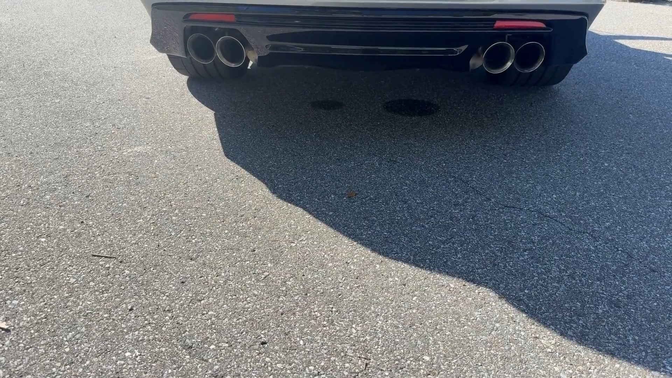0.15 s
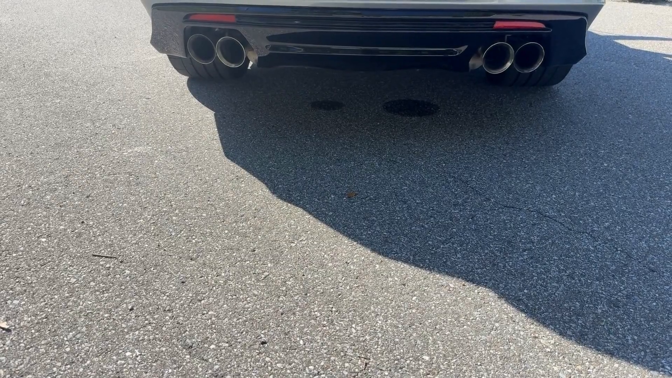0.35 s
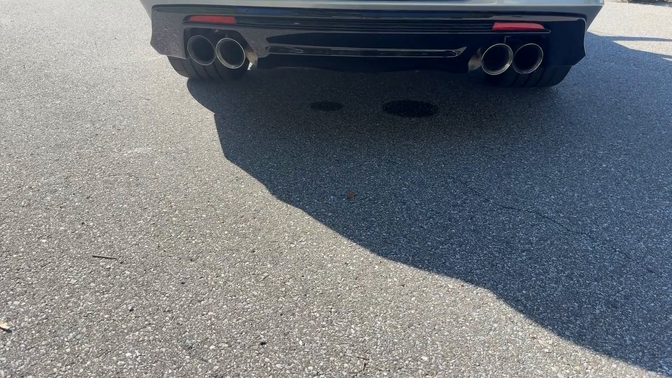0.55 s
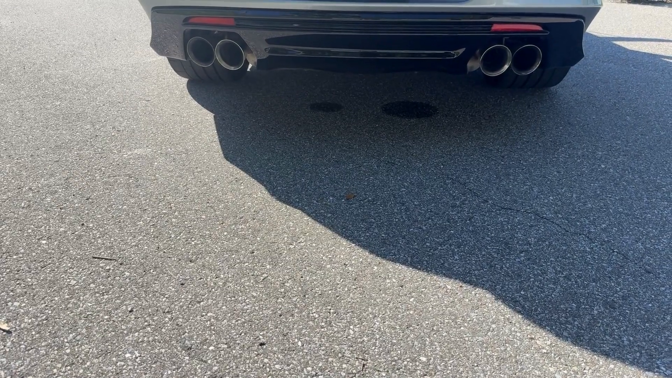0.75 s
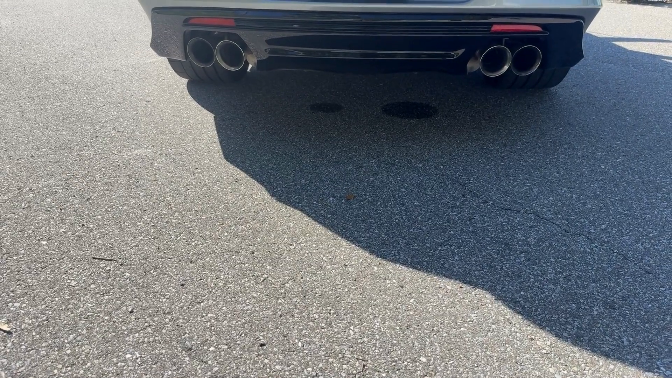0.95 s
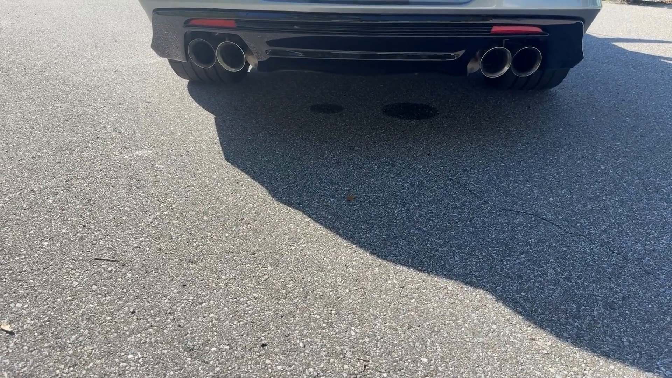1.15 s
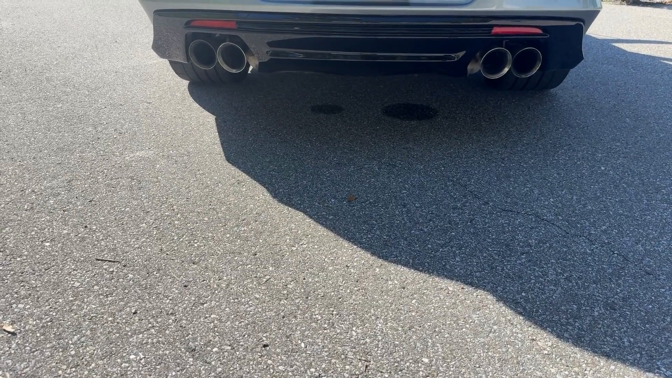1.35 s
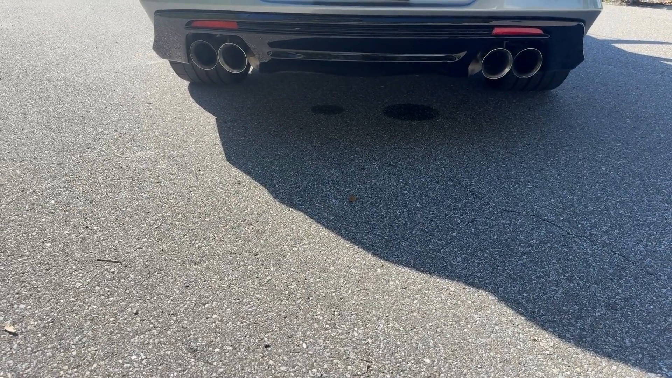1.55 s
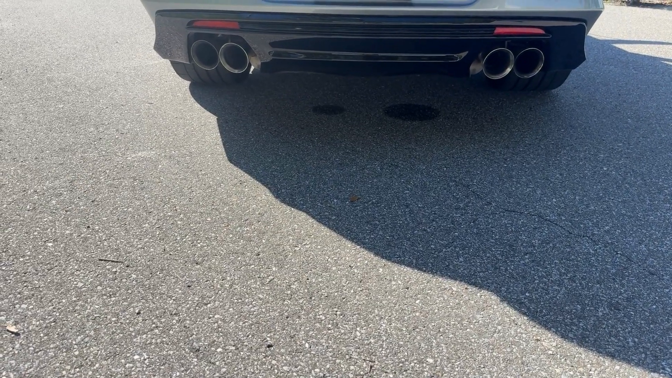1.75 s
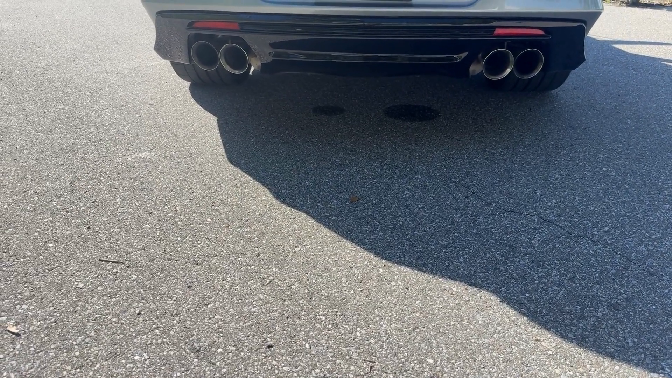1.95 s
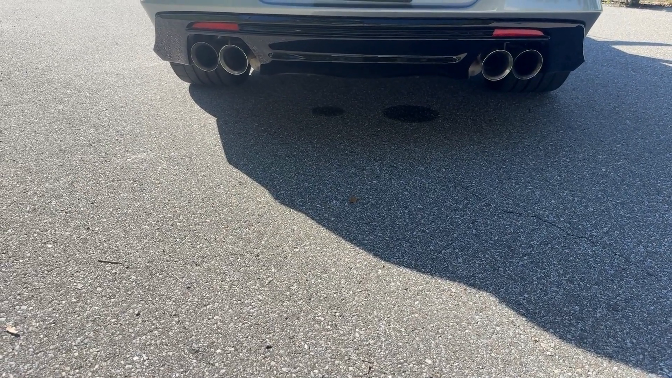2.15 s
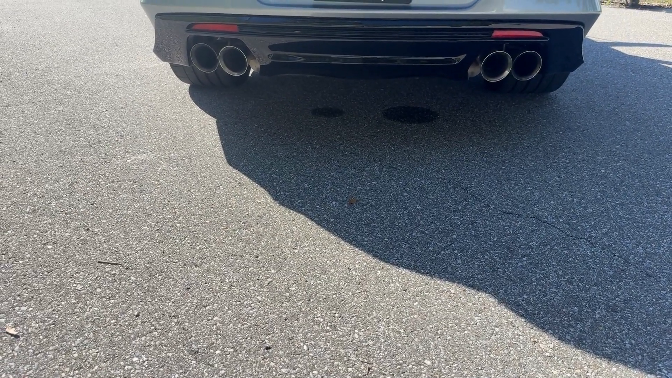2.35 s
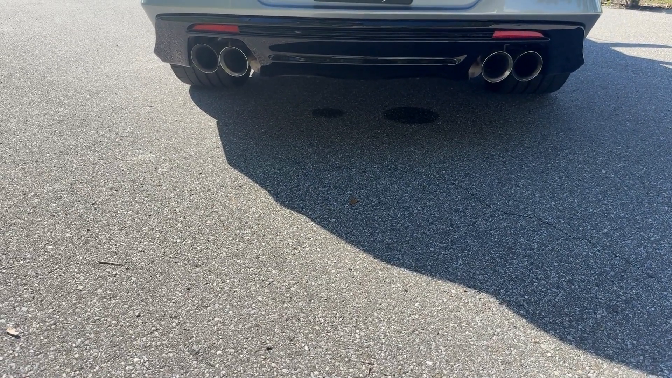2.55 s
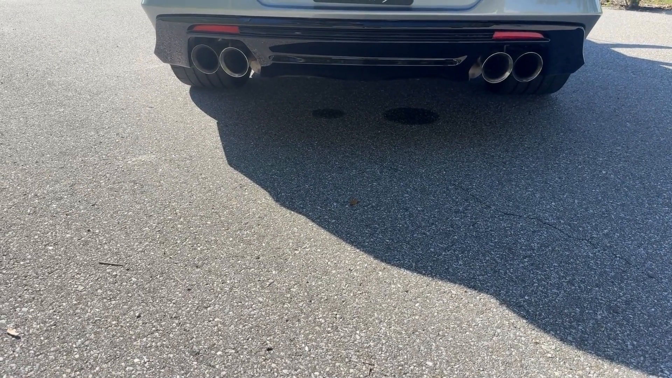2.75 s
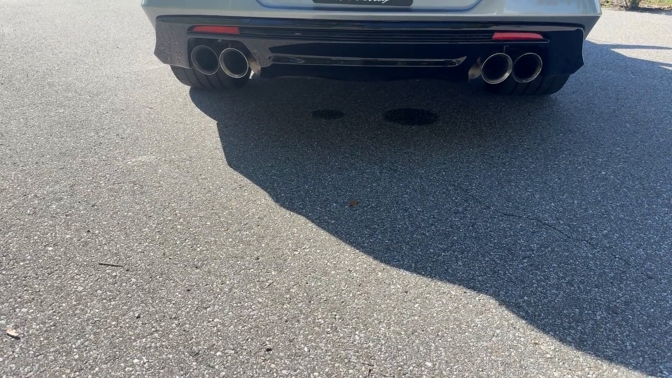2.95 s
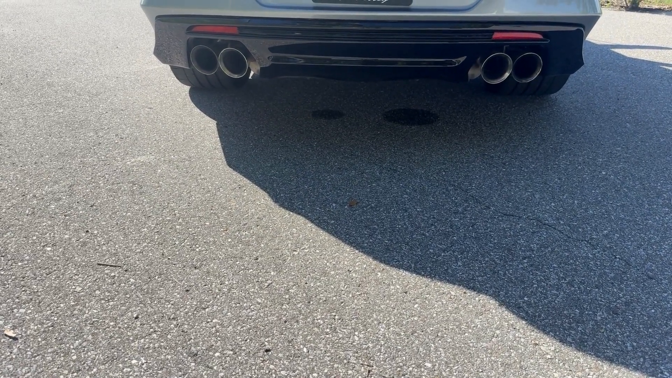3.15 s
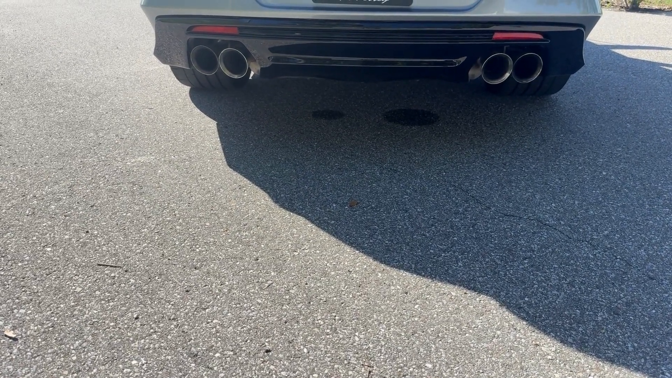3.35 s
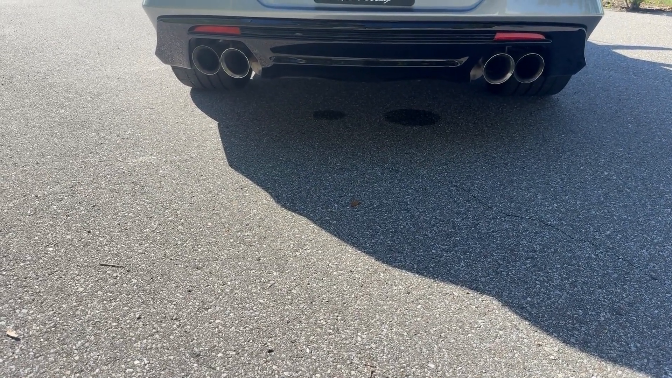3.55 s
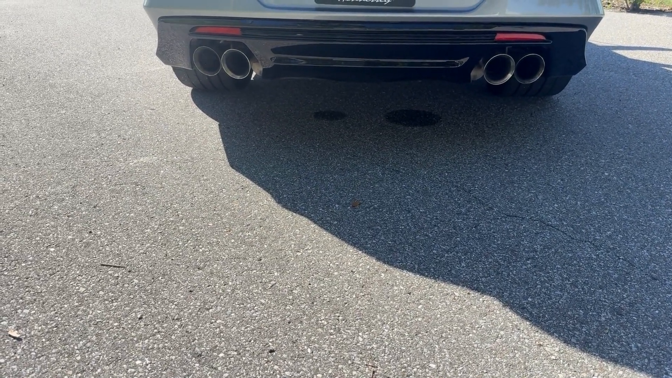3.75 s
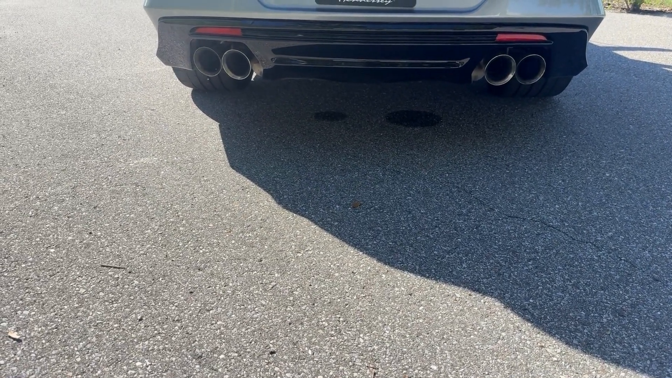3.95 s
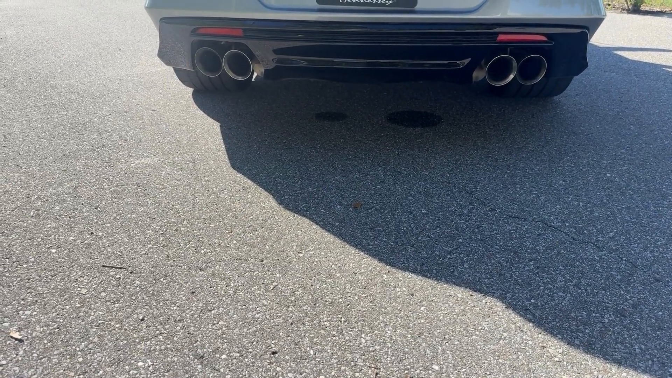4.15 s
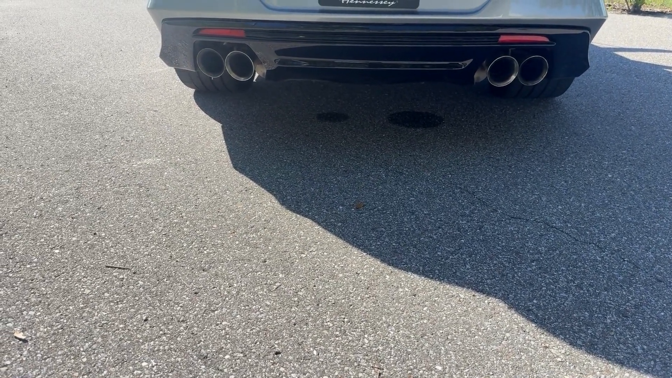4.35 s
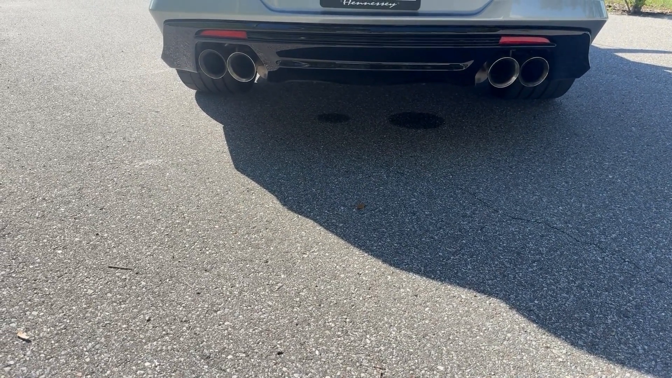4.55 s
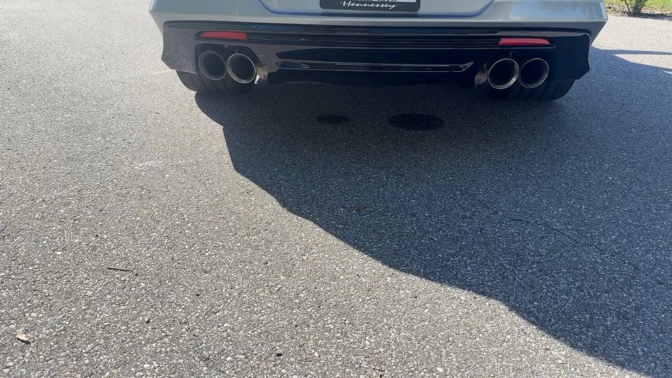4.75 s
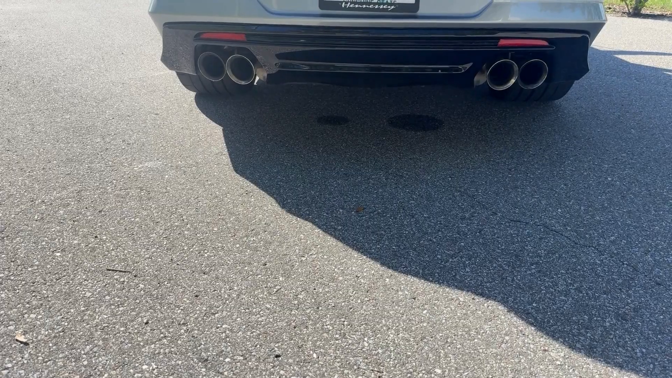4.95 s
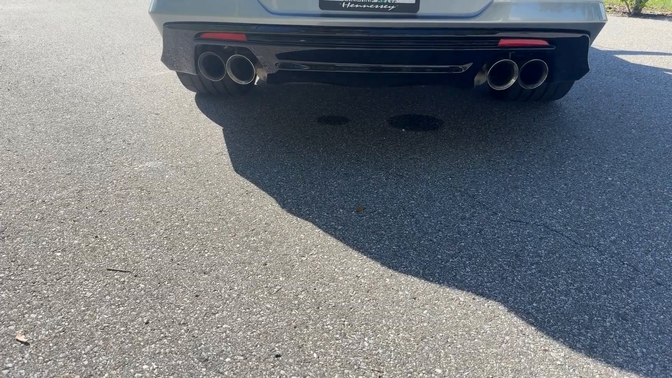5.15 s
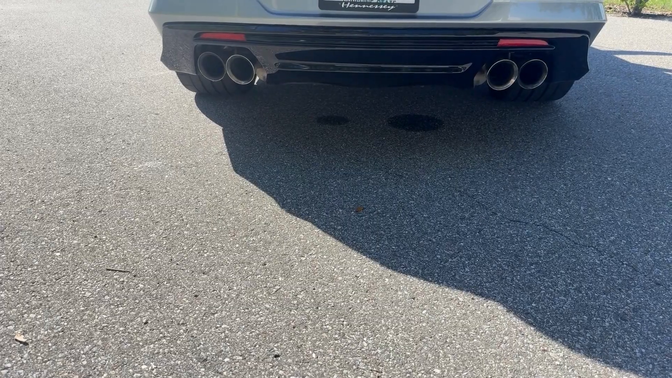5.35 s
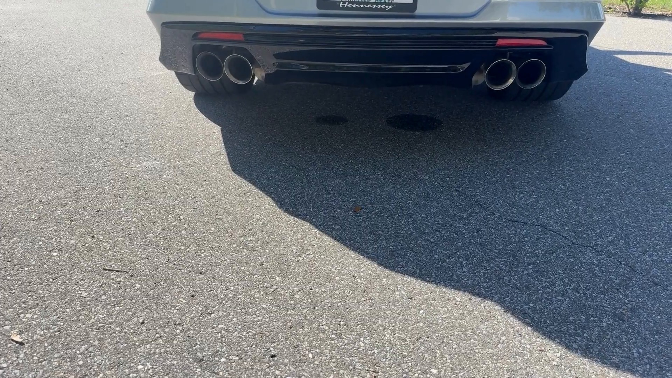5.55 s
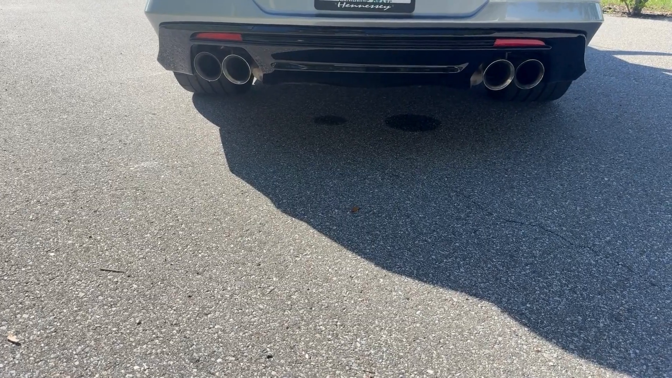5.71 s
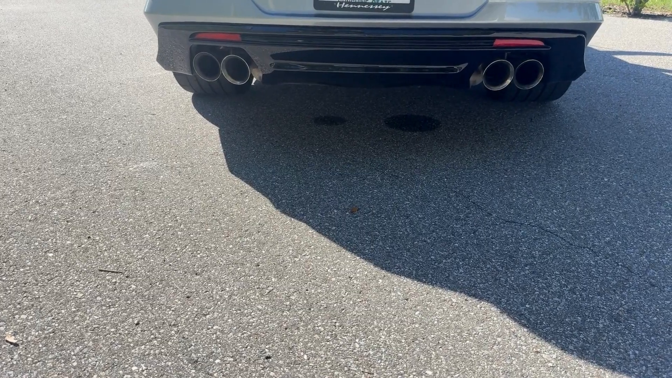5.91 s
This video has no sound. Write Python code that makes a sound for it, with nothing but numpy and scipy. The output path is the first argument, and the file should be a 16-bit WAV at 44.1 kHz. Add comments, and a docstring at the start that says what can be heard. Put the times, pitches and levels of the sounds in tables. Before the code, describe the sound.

Low traffic rumbles in an open lot. A few metres behind a car's tailpipes, the starter clunks in and cranks with a rising and sagging gear whine. The supercharged V8 catches with a loud flare and a rapid burst of exhaust bangs, then sinks to a deep, loping fast idle with scattered pops.

```python
"""A supercharged V8 starts in an open lot, heard a few metres behind its tailpipes.
Traffic rumbles throughout. At 2.3 s the solenoid ticks and the starter pinion clunks in; its gear whine
rises and sags with every compression. At 3.4 s the engine catches and flares, unburnt fuel banging in
the pipes. From 4 s it sinks to a deep, loping fast idle: gas slugs boom, growl, rasp and hiss through
the exhaust, with scattered misfires and pops."""
import sys
import numpy as np
from scipy import signal
from scipy.fft import rfft, irfft
from scipy.io import wavfile
from scipy.ndimage import uniform_filter1d, map_coordinates

SR = 44100
rng = np.random.default_rng(int(sys.argv[2]) if len(sys.argv) > 2 else 0)


def digitize_waveform(pressure):
    """Quantize a signal to 16-bit integers and store it at the path in sys.argv[1].

    Rows of a 2-D input are taken as channels; values are limited to [-1, 1].
    """
    field = np.atleast_2d(pressure).T
    bounded = np.clip(field, -1, 1)
    quanta = np.round(bounded * 32767).astype(np.int16)
    wavfile.write(sys.argv[1], SR, quanta)


N = 268128
TIME = np.arange(N) / SR
CATCH_S, BURST_ATTACK_S, BURST_HOLD_S = 3.385, 0.0085, 0.31

# exhaust pipe response: f/Hz, level/dB
PIPE_SPECTRUM = [(22, -35), (38, -4), (55, -6), (130, 6), (210, 1.5), (270, -10.5), (340, -11),
                 (460, -10.5), (600, -14), (800, -25), (1100, -27.5), (2500, -68.5)]
# tailpipe rasp: f/Hz, level/dB
RASP_SPECTRUM = [(250, -15), (500, 9.5), (850, -2.5), (1000, 0.5), (1120, 11.5), (1280, 5.5), (1450, 8),
                 (1680, -2), (1900, 3.5), (2120, 4), (2300, -39), (2850, -22), (3600, -23), (7000, -20)]
# stereo width of gear noise: f/Hz, side over mid/dB
GEAR_SPREAD = [(2000, -30), (4000, -19), (6500, -14), (9500, -9), (13000, -8)]
# overfull firings: t/s, level/dB
POP_EVENTS = [(3.7373, -26), (3.8128, -22), (3.851, -9.5), (3.8793, -12), (3.9374, -14.5), (4.0023, -6.5),
              (4.079, -16), (4.1566, -14.5), (4.1967, -19), (4.5685, -16), (4.6747, -19.5), (4.7218, -24.5),
              (4.771, -17), (4.8065, -25), (4.974, -19), (5.0778, -27), (5.1958, -21.5), (5.329, -17.5),
              (5.826, -23.5), (6.04, -24)]


def from_db(db):
    return 10 ** (np.asarray(db) / 20)


def unit_rms(x):
    return x / np.sqrt(np.mean(x ** 2) + 1e-20)


def levelled(x, window=4500):
    """Slow RMS held at 1; single beats remain."""
    return x / np.sqrt(np.abs(uniform_filter1d(x ** 2, window)) + 1e-12)


def curve(rows):
    return np.interp(TIME, *np.transpose(rows))


def ramp(start_s, length_s):
    return np.clip((TIME - start_s) / length_s, 0, 1)


def ease_out(start_s, length_s):
    return np.exp(-(np.maximum(TIME - start_s, 0) / length_s) ** 2)


def bump(centre_s, sigma_s):
    return np.exp(-.5 * ((TIME - centre_s) / sigma_s) ** 2)


def noise():
    return rng.standard_normal(N)


def drift(rate_hz):
    """Smooth random curve, spread about 1."""
    knots = rng.standard_normal(4096)
    return map_coordinates(knots, [TIME * rate_hz], order=2, mode="wrap")


def coloured(x, spectrum, size=8192):
    """Minimum-phase filter from rows of f/Hz, level/dB."""
    hz, db = np.transpose(spectrum)
    grid_hz = np.maximum(np.arange(size // 2 + 1) * SR / size, 1)
    gain = from_db(np.interp(np.log(grid_hz), np.log(hz), db))
    cepstrum = irfft(np.log(gain))
    cepstrum[1:size // 2] *= 2
    cepstrum[size // 2 + 1:] = 0
    return signal.oaconvolve(x, irfft(np.exp(rfft(cepstrum))))[:N]


def stereo_noise(envelope, spectrum, spread, width=1):
    mid = coloured(noise() * envelope, spectrum)
    side = width * coloured(coloured(noise() * envelope, spectrum), spread)
    return np.array([mid + side, mid - side])


def delayed(x, lag_s):
    return np.interp(TIME - lag_s, TIME, x, left=0)


def kicks_at(events):
    """One impulse per row of t/s, level/dB."""
    kicks = np.zeros(N)
    for s, db in events:
        kicks[int(s * SR)] += from_db(db)
    return kicks


def decay(kicks, decay_s):
    return signal.lfilter([1], [1, -np.exp(-1 / (decay_s * SR))], kicks + 1e-18)


def rise_decay(kicks, rise_s, decay_s):
    return decay(decay(kicks, rise_s) / (rise_s * SR), decay_s)


def ring(x, hz, t60_s):
    """Damped mode; a unit impulse rings at height 1."""
    r, w = from_db(-60 / (t60_s * SR)), 2 * np.pi * hz / SR
    return signal.lfilter([0, np.sin(w)], [1, -2 * r * np.cos(w), r * r], x + 1e-18)


def low_cut(x, hz):
    return signal.sosfilt(signal.butter(3, hz, "high", fs=SR, output="sos"), x)


def traffic(level_db=-36.5, drone_hz=66, drone_db=-8, waver=0.0786, throb_db=4):
    """Wide rumble from all around, with a wavering drone."""
    # rumble: f/Hz, level/dB
    spectrum = [(20, -46), (32, -31), (48, -5), (69, -2.5), (95, -8), (189, -16), (337, -30), (809, -28),
                (1440, -36.5), (2700, -45.5), (3970, -57), (6320, -57.5), (14000, -73)]
    # width: f/Hz, side over mid/dB
    spread = [(50, -25), (130, -16), (250, -10), (500, -5), (1000, -3), (2000, -7), (4000, -14)]
    cycles = np.cumsum(drone_hz * (1 + waver * drift(7.2))) / SR
    drone = np.sin(2 * np.pi * cycles) * from_db(throb_db * drift(12))
    rumble = unit_rms(stereo_noise(1, spectrum, spread))
    return from_db(level_db) * (rumble + from_db(drone_db) * unit_rms(drone))


def outdoors(direct, scatter_db, onset_s=.003, decay_s=.025, size=8192):
    """Adds echoes, and scatter from the sides that widens the sound."""
    # echoes off ground, car and far walls: delay/s, level/dB
    reflections = [(.0047, -22), (0.0138, -26.5), (0.028, -17.5), (.047, -16), (0.082, -20.5)]
    # scatter width: f/Hz, side over mid/dB
    spread = [(40, -31), (125, -12), (250, -14.5), (500, -11), (1500, -11), (4000, -18), (13000, -56)]
    mid = direct.mean(axis=0)
    bright = mid - coloured(mid, [(150, 0), (500, -20), (2000, -40)])
    echoes = sum(from_db(db) * delayed(bright, s) for s, db in reflections)
    tail = rng.standard_normal(size) * np.exp(-TIME[:size] / decay_s) * (TIME[:size] > onset_s)
    scatter = signal.oaconvolve(mid, tail / np.linalg.norm(tail))[:N]
    side = from_db(scatter_db) * coloured(scatter, spread)
    return direct + echoes + np.array([side, -side])


def pinion(ring_db=-9, clash_db=-5, thud_db=-4, bounce_s=.0066, bounce_loss_db=6):
    """The pinion bounces into mesh and rings the housing; seating, it thuds down the pipes."""
    # solenoid tick: t/s, level/dB
    tick = [(2.332, -53)]
    # pinion hits the ring gear, then seats: t/s, level/dB
    clunks = [(2.3838, -25), (2.405, -27.5)]
    # starter housing modes, and a low thud of the car's body: f/Hz, level/dB, t60/s
    housing = [(81.5, 2, 0.18), (370, 0.5, 0.42), (447, 1, 0.098), (806, -1, 0.052), (1280, 3, .04)]
    # steel teeth clashing: f/Hz, level/dB
    clash_spectrum = [(200, -20), (400, 6), (1500, -2), (2800, 5), (4300, -9), (8000, -12.5), (16000, -17)]
    kicks = kicks_at([(s + bounce_s * k * rng.uniform(1.0, 1.15), db - bounce_loss_db * k)
                      for s, db in clunks for k in range(3)])
    rings = sum(from_db(db) * ring(kicks * rng.choice([-1, 1], N), hz, t60) for hz, db, t60 in housing)
    clash = unit_rms(stereo_noise(1, clash_spectrum, GEAR_SPREAD))
    clash *= rise_decay(kicks + kicks_at(tick), rise_s=0.00035, decay_s=0.014)
    thud = unit_rms(coloured(noise(), PIPE_SPECTRUM))
    thud *= rise_decay(kicks_at(clunks[-1:]), rise_s=0.0068, decay_s=.03)
    return from_db(ring_db) * rings + from_db(clash_db) * clash + from_db(thud_db) * thud


def cranking(attack_s=0.015, off_s=3.41, speed_power=0.39):
    """Mesh rate and gain of the starter: each compression loads the teeth; faster is louder."""
    # compression strokes: t/s, level/dB, fade over the stroke/dB
    strokes = [(2.376, -35.5, -9), (2.835, -34.5, 4.5), (3.022, -33, 11.5), (3.175, -31.5, 16),
               (3.283, -33, 5.5)]
    # gear mesh rate: t/s, f/Hz
    mesh_rate = [(2.39, 450), (2.5, 760), (2.57, 890), (2.63, 990), (2.67, 890), (2.73, 715), (2.78, 760),
                 (2.85, 1200), (2.905, 1000), (2.945, 910), (2.99, 960), (3.03, 1350), (3.07, 1140),
                 (3.13, 1020), (3.185, 1420), (3.26, 1180), (3.29, 1440), (3.38, 1260)]
    ends_s = [row[0] for row in strokes[1:]] + [off_s]
    gain = 0
    for (start_s, db, fade_db), end_s in zip(strokes, ends_s):
        gate = ramp(start_s, attack_s) - ramp(end_s, attack_s)
        gain += gate * from_db(db - fade_db * ramp(start_s, end_s - start_s) ** 2)
    mesh_hz = uniform_filter1d(curve(mesh_rate), 900)
    return mesh_hz, gain * (mesh_hz / mesh_hz.max()) ** speed_power


def starter(level_db=-0.5, whine_db=-4, grind_db=-5, singing_db=-8, chuff_db=-10, tooth_count=11):
    """Teeth whine, grind and set the ring gear singing; pistons chuff air down the pipes."""
    # whine partials: multiple of mesh rate, level/dB
    partials = [(.49, -1), (1, 6.5), (1.45, -5), (2.17, 2), (3.2, -4), (4.001, -5), (5.1, -5), (6.002, -5)]
    # path under the car: f/Hz, level/dB
    underbody = [(350, -10), (650, 1), (950, 2), (1400, -6), (2100, 0), (6000, -2)]
    # grinding teeth: f/Hz, level/dB
    grind_spectrum = [(150, -37), (270, -4.5), (414, -4), (690, -1), (2090, -7), (4410, -16), (8260, -19),
                      (10700, -19), (16000, -27)]
    # ring gear and cover modes: f/Hz, level/dB, t60/s
    modes = [(662.5, 6.5, 0.053), (2410, -9, 0.02), (3470, -5, 0.014)]
    mesh_hz, gain = cranking()
    teeth = np.cumsum(mesh_hz * (1 + .008 * drift(90) + .02 * drift(500))) / SR
    phase = 2 * np.pi * teeth
    # unequal teeth add sidebands
    wear = from_db(3 * rng.standard_normal(tooth_count))[teeth.astype(int) % tooth_count]
    whine = wear * sum(from_db(db + 4 * drift(110)) * np.sin(ratio * phase) for ratio, db in partials)
    # past each compression the crank springs ahead and the teeth go slack
    overrun = np.maximum(np.gradient(np.log(mesh_hz)) * SR, 0)
    whine = unit_rms(coloured(whine, underbody) * from_db(-0.25 * overrun ** 2))
    grind = unit_rms(stereo_noise(1 + 0.38 * np.cos(phase), grind_spectrum, GEAR_SPREAD))
    singing = sum(from_db(db) * unit_rms(ring(grind[0] + whine, hz, t60)) for hz, db, t60 in modes)
    chuff = coloured(noise(), PIPE_SPECTRUM)
    parts = [(whine_db, whine), (grind_db, grind), (singing_db, singing), (chuff_db, chuff)]
    return from_db(level_db) * gain * sum(from_db(db) * unit_rms(part) for db, part in parts)


def bark(kicks, spectrum, snap_db, rise_s, decay_s):
    """A pressure front and the gas puff behind it sound the pipes."""
    gain = 1 / np.std(coloured(noise(), spectrum))
    puff = noise() * rise_decay(kicks, rise_s, decay_s)
    return gain * coloured(from_db(snap_db) * kicks + puff, spectrum)


def pops(level_db=-6):
    """Each overfull firing barks once, sharply, at the tips."""
    kicks = kicks_at(POP_EVENTS)
    return from_db(level_db) * bark(kicks, RASP_SPECTRUM, snap_db=18, rise_s=0.00082, decay_s=0.0027)


def bangs(level_db=-5):
    """Unburnt fuel goes off: a crack at the tips, a bark in the pipes, a deep thump."""
    # bangs: t/s, bark level/dB, crack level/dB
    events = [(3.389, -14, -14), (3.395, -9.5, -12), (3.4158, -8, -19), (3.422, -11, -10),
              (3.4366, -2.5, -23), (3.456, 1.5, -10), (3.4709, 0.5, -8), (3.4838, -5, -10), (3.498, -8, 0),
              (3.511, -0.5, -18), (3.5206, -12, -8), (3.5329, -16, -4), (3.545, -7, -5), (3.5645, -9, -3.5),
              (3.5748, 0, -2), (3.586, -21, -12), (3.6148, -3.5, -5.5), (3.636, -12, -17),
              (3.6521, -6, -3.5), (3.6984, -4.5, -10), (3.766, -11.5, -25), (4.2353, -8.5, -28),
              (4.582, -12, -34)]
    # struck tailpipes: f/Hz, level/dB
    bark_spectrum = [(120, -11), (250, 7.5), (550, 4), (820, -14), (1150, 3.5), (1500, -2), (1750, -3.5),
                     (2080, -1), (2500, -13), (5000, -27.5)]
    # crack: f/Hz, level/dB
    crack_spectrum = [(300, -16), (1000, -18), (2100, 7), (3500, 7), (4600, 14.5), (6000, 9), (11000, 9.5),
                      (15500, 6)]
    # crack width: f/Hz, side over mid/dB
    crack_spread = [(2000, -11), (5000, -11), (9000, -8), (13000, 0)]
    # deepest pipe modes: f/Hz, level/dB, t60/s
    modes = [(46.2, -8, 0.44), (68, -5.5, 0.12), (150, -7.5, 0.053)]
    blows = kicks_at((s, db) for s, db, _ in events)
    snaps = kicks_at((s, db) for s, _, db in events)
    barks = bark(blows, bark_spectrum, snap_db=14, rise_s=0.00065, decay_s=0.003)
    cracks = unit_rms(stereo_noise(1, crack_spectrum, crack_spread))
    cracks *= rise_decay(snaps, rise_s=0.00036, decay_s=0.0018)
    thumps = sum(from_db(db) * ring(blows, hz, t60) for hz, db, t60 in modes)
    return from_db(level_db) * (barks + cracks + low_cut(thumps, hz=38))


def revs(catch_hz=46, run_up_s=.125, release_s=0.02205):
    """Firing rate, flare (0 idle, 1 top speed) and burst (0-1: first firings gulp the manifold air)."""
    # firing rate from flare to idle: t/s, f/Hz
    firing_rate = [(3.66, 105.5), (4.0, 106), (4.2, 102), (4.4, 93), (4.6, 86), (4.8, 80), (5.0, 77),
                   (5.3, 75.3), (6.05, 74.6)]
    target_hz = curve(firing_rate)
    idle_hz = target_hz[-1]
    firing_hz = target_hz - (target_hz - catch_hz) * ease_out(CATCH_S, run_up_s)
    flare = np.clip((firing_hz - idle_hz) / (target_hz.max() - idle_hz), 0, 1)
    burst = ramp(CATCH_S, BURST_ATTACK_S) * ease_out(CATCH_S + BURST_HOLD_S, release_s)
    return firing_hz, flare, burst


def lope(firing_hz, swell_db=1.5, swell_s=0.025, throb_db=1.5, drift_db=0.72):
    """Firing strength in dB: dips at misfires, swells around pops, throbs once per crank turn."""
    # misfires: t/s, level/dB, half length/s
    misfires = [(3.685, -26, 0.0041), (3.735, -5, 0.078), (3.92, -12.5, 0.02), (4.056, -3.5, 0.015),
                (4.19, -9.5, 0.014), (4.338, -11, 0.013), (4.506, -3.5, 0.016), (4.708, -8, 0.012),
                (4.878, -6.5, 0.0086), (5.04, -3.5, 0.028), (5.165, -5, 0.029), (5.388, -10.5, 0.0073),
                (5.601, -6.5, 0.014), (6, -8, 0.0095)]
    dips = sum(db * bump(s, sigma_s) for s, db, sigma_s in misfires)
    swells = swell_db * sum(bump(s, swell_s) for s, _ in POP_EVENTS)
    turns = np.cumsum(firing_hz) / SR / 4
    return dips + swells + throb_db * np.sin(2 * np.pi * turns) + drift_db * drift(22.09)


def firings(firing_hz, ragged, start_s=3.396, jitter=0.057):
    """Crank angle in firings, and one kick per firing; ragged combustion scatters time and strength."""
    # cylinders in firing order: level/dB
    cylinders_db = [5.5, 1.5, 0, 0.7, 2.5, 3, -3, 0]
    angle = np.cumsum(firing_hz * (TIME > start_s)) / SR
    fired = np.floor(np.maximum(angle + jitter * ragged * drift(80), 0))
    at = np.flatnonzero(np.diff(fired) > 0)
    scatter_db = 3 * np.sqrt(ragged[at]) * noise()[at]
    kicks = np.zeros(N)
    kicks[at] = from_db(np.resize(cylinders_db, len(at)) + scatter_db)
    return angle, kicks


def hiss(kicks, effort, steepness=1.1, jet_s=0.018, lag_s=.004, widening_db=13.5):
    """Each gas slug leaves the tips as a short turbulent jet, wider under effort."""
    # jet noise: f/Hz, level/dB
    spectrum = [(1650, -8), (2800, 5), (3900, -6), (4560, 6), (5100, -5), (9200, -7.5), (10600, 0),
                (14700, -4), (16000, -13.5)]
    # width at idle: f/Hz, side over mid/dB
    spread = [(2000, -20), (4000, -34), (7000, -30), (13000, -25)]
    jets = delayed(decay(kicks ** steepness, jet_s), lag_s)
    return levelled(stereo_noise(jets, spectrum, spread, from_db(widening_db * effort)))


def sputter(kicks, count=3, loss_db=5.5, scatter_db=2.5):
    """Each slug breaks into unevenly spaced fronts, later and weaker."""
    at = np.flatnonzero(kicks)
    late = rng.random((N, count))[at]
    chance_db = scatter_db * rng.standard_normal((N, count))[at]
    fronts = np.zeros(N + SR)
    for k in range(count):
        lag_s = .0015 + .003 * (k + (k + 1) * late[:, k])
        fronts[at + (lag_s * SR).astype(int)] += kicks[at] * from_db(chance_db[:, k] - loss_db * k)
    return fronts[:N]


def rasp(kicks, spectrum, steepness, puff_s, snap_db):
    """Strong pulses steepen into sputtering fronts that sound the tailpipes."""
    fronts = sputter(kicks ** steepness)
    puffs = noise() * decay(fronts, puff_s)
    return levelled(coloured(from_db(snap_db) * fronts + puffs, spectrum))


def boom(angle, kicks, ragged, waver_db=2.0, gust_db=-21, gust_s=0.011, bank_lag_s=0.0023, bank_db=-4):
    """Smooth engine orders plus uneven gas slugs from two banks, rounded by the pipes."""
    # smooth gas flow: multiple of firing rate, level/dB
    orders = [(1, 0.5), (2, -4), (3, -18.5), (4, -22.5), (5, -32), (6, -28)]
    flow = sum(from_db(db) * np.sin(2 * np.pi * k * angle + np.pi / 4 * k ** 2) for k, db in orders)
    flow = levelled(flow * from_db(waver_db * drift(35)))
    # a cross-plane crank feeds the banks unevenly
    far_bank = np.array([1, 0, 1, 0, 0, 1, 0, 1])[angle.astype(int) % 8]
    slugs = kicks * (1 - far_bank) + from_db(bank_db) * delayed(kicks * far_bank, bank_lag_s)
    gusts = from_db(gust_db) * noise() * decay(kicks, gust_s)
    pulses = levelled(coloured(slugs + gusts, PIPE_SPECTRUM))
    return levelled(np.sqrt(1 - ragged) * flow + np.sqrt(ragged) * pulses)


def voice_gain(levels, flare, burst):
    """An exhaust voice grows with speed; the burst comes on top."""
    idle_db, flare_db, power, *burst_db = levels
    running = from_db(idle_db) + (from_db(flare_db) - from_db(idle_db)) * flare ** power
    opening = from_db(np.interp(ramp(CATCH_S, BURST_HOLD_S), [0, .5, 1], burst_db))
    return np.hypot(ramp(CATCH_S, BURST_ATTACK_S) * running, burst * opening)


def engine(boom_lope=0.95, growl_lope=0.88, rasp_lope=0.93, hiss_lope=1.0):
    """Four exhaust voices follow the same firings, each with its share of the lope; pops on top."""
    # voice levels: idle/dB, flare/dB, growth exponent, burst start/dB, middle/dB, end/dB
    boom_levels = (-21.5, -18, 1.2, -14, -12, -19)
    growl_levels = (-45.5, -26.5, 1, -43, -18, -21.5)
    rasp_levels = (-38.5, -31, 3, -17, -25.5, -54)
    hiss_levels = (-47.5, -36.5, 7, -23.5, -30, -24)
    # pipes under a hard pulse: f/Hz, level/dB
    growl_spectrum = [(90, -30.5), (180, 16.5), (260, 18.5), (400, 15), (600, 10.5), (800, 4),
                      (1100, -11.5), (1450, -6.5), (1700, -1.5), (2050, -13), (2400, -8), (5000, -19.5)]
    firing_hz, flare, burst = revs()
    ragged = .26 + 0.035 * flare + .32 * burst   # combustion: 0 smooth, 1 ragged
    lope_db = lope(firing_hz)
    angle, kicks = firings(firing_hz, ragged)
    voices = [
        (boom_levels, boom_lope, boom(angle, kicks, ragged)),
        (growl_levels, growl_lope, rasp(kicks, growl_spectrum, 0.65, puff_s=0.0074, snap_db=6)),
        (rasp_levels, rasp_lope, rasp(kicks, RASP_SPECTRUM, 0.75, puff_s=0.0025, snap_db=7.5)),
        (hiss_levels, hiss_lope, hiss(kicks, effort=np.maximum(flare, burst)))]
    exhaust = sum(voice_gain(levels, flare, burst) * from_db(share * lope_db) * sound
                  for levels, share, sound in voices)
    return exhaust + pops()


def scene():
    """Starter from under the car, tailpipes head-on, bangs from all around."""
    under_car = outdoors(pinion() + starter(), scatter_db=-5)
    return traffic() + under_car + outdoors(engine(), scatter_db=-17.5) + outdoors(bangs(), scatter_db=0)


def record(dry, low_hz=29, high_hz=15900):
    """Low cut, soft clip, steep high cut."""
    rounded = np.tanh(low_cut(dry, low_hz))
    return signal.sosfilt(signal.ellip(10, .2, 80, high_hz, fs=SR, output="sos"), rounded)


dry = scene()
out = record(dry)
digitize_waveform(out)
```